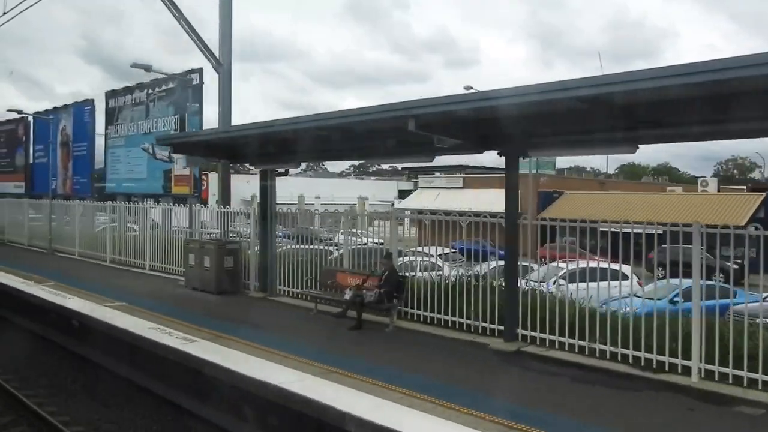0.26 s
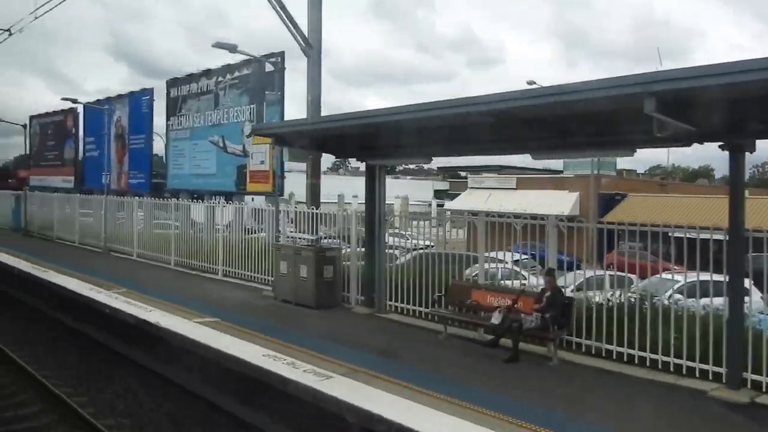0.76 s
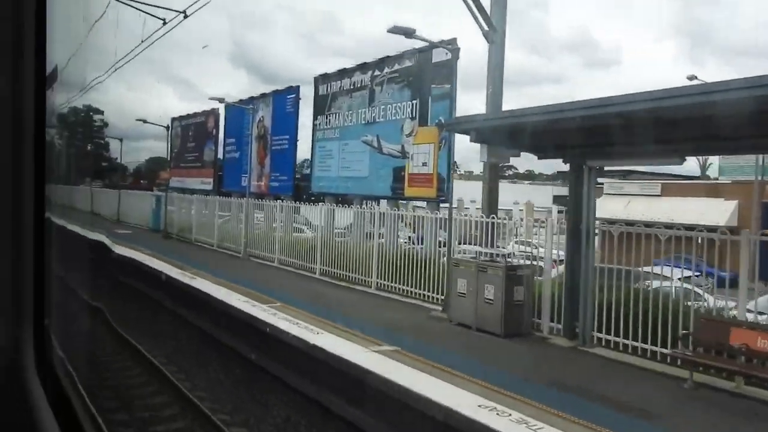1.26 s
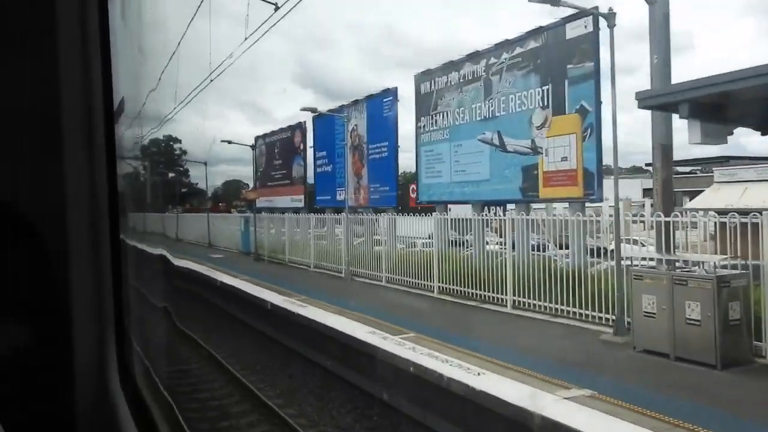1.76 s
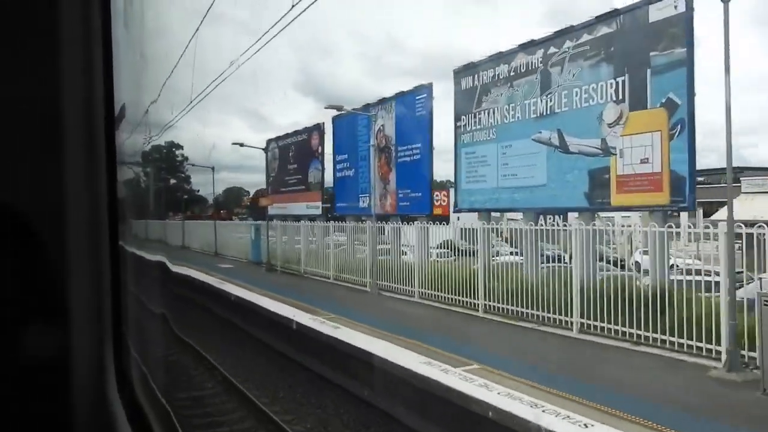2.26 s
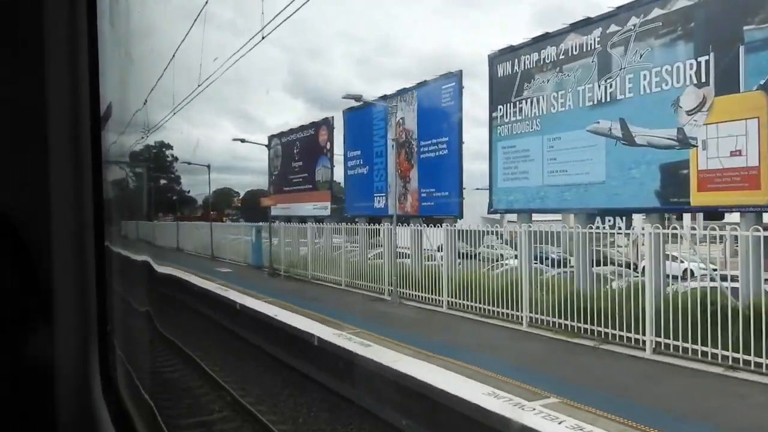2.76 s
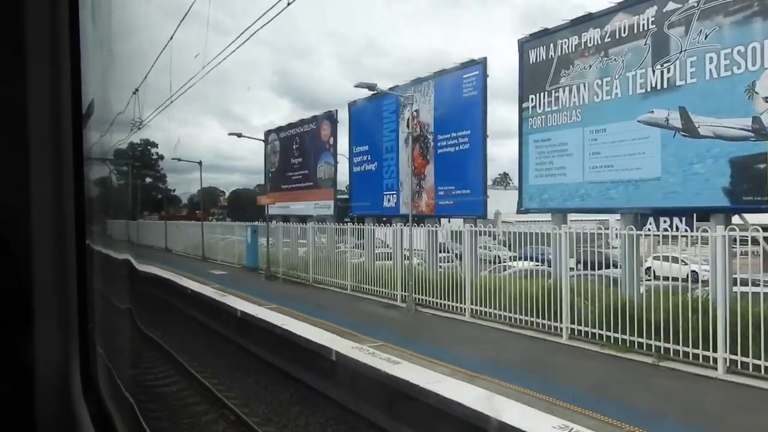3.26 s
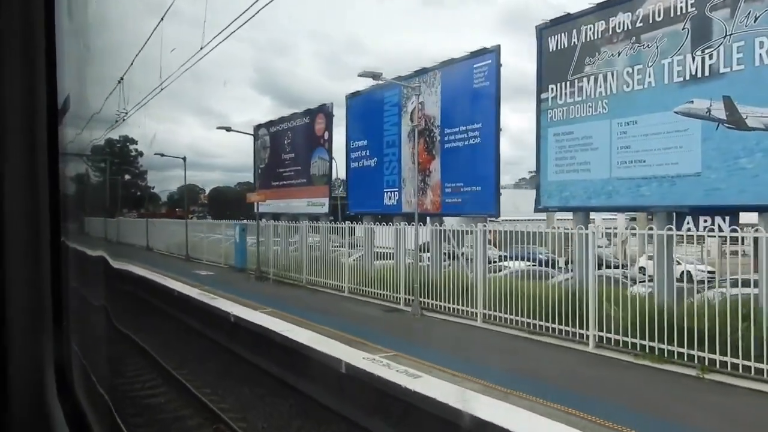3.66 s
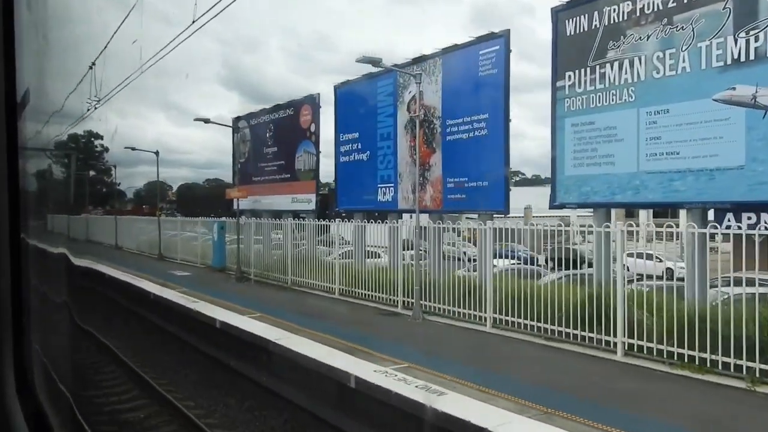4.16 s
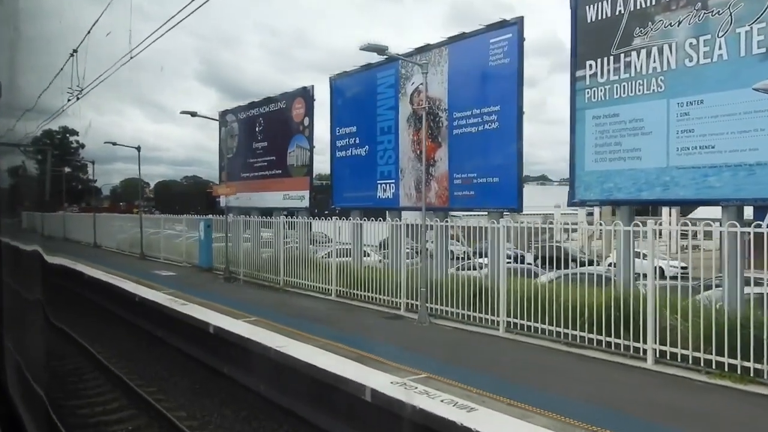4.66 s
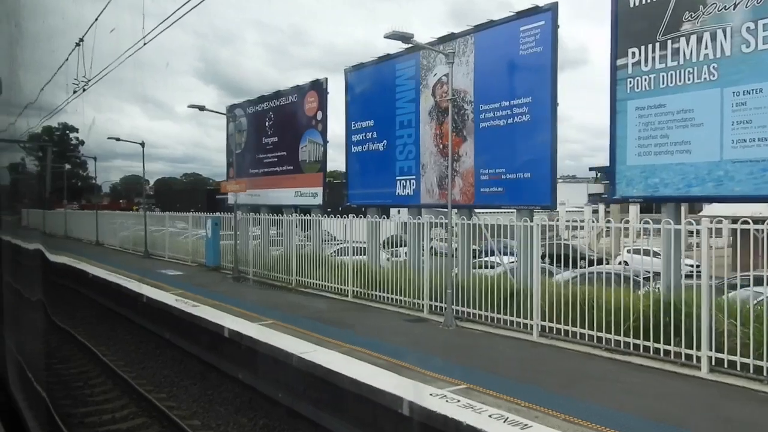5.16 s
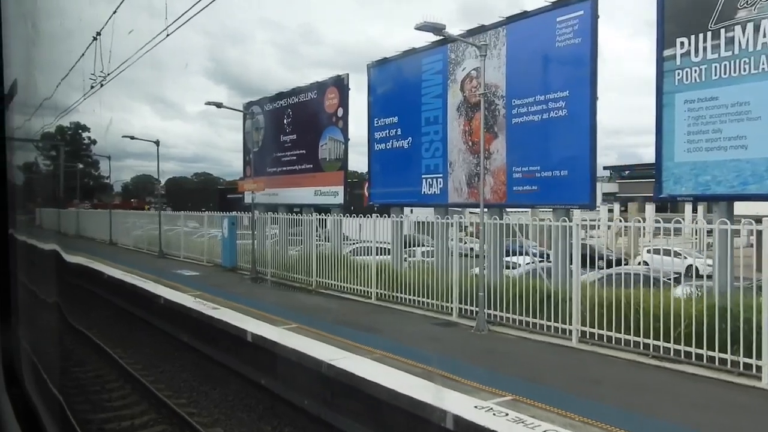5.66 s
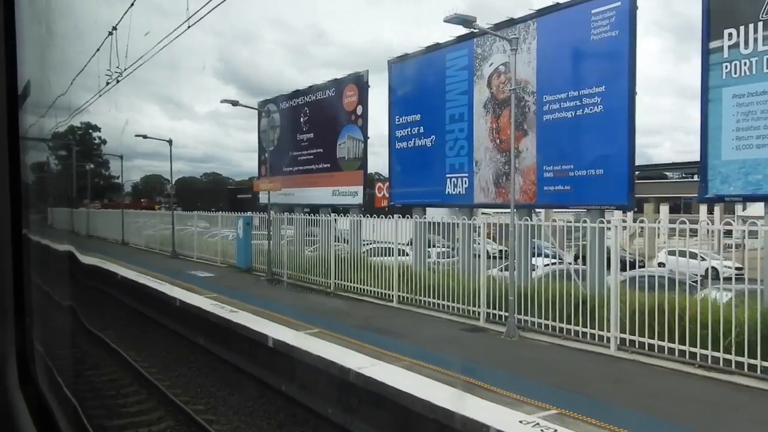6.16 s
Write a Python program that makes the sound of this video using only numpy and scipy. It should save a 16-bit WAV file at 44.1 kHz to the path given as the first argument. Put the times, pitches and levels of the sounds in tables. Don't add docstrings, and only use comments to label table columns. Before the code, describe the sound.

For about 6.4 seconds we are inside a slowly moving electric train carriage, near the window. A thick, low rolling rumble runs throughout, mostly below 250 hertz, with a deep boom that swells and sinks unevenly and a steadier compressor drone around 190 hertz that dips briefly near 0.8 and 1.9. Softer panel noise and a faint vent hiss lie above. At 0.4 a soft breathy valve whistle puffs, with a tiny click. Small dull metallic ticks come at 1.2 and 1.3, then a pair near 1.6 and a double hit at 1.75, with short airy puffs. Very faint, thin brake squeaks glide around 2.6, 4.7 to 5.0 and 5.7, with a barely audible click at 3.1. A slow weak air release comes at 5.5, and a short, clearer burst of air at 6.0. The rumble continues to the end in a small, enclosed cabin.

```python
import sys
import numpy as np
from scipy import signal
from scipy.fft import rfft, irfft, next_fast_len
from scipy.io import wavfile
from scipy.ndimage import uniform_filter1d, map_coordinates

SR = 44100
rng = np.random.default_rng(int(sys.argv[2]) if len(sys.argv) > 2 else 0)


def dump(signal):
    limited = np.clip(np.atleast_2d(signal).T, -1, 1)
    pcm = np.round(limited * 32767).astype(np.int16)
    wavfile.write(sys.argv[1], SR, pcm)


def ratio_of_db(decibels):
    return 10 ** (np.asarray(decibels, float) / 20)


N = 282240

# t/s, level/dB
BOOM_LEVEL = [(0.0, -20), (0.05, -24), (0.46, -40), (0.48, -32), (0.98, -44.5), (1.64, -20), (1.82, -34.5),
              (1.98, -29.5), (2.05, -34.5), (2.58, -29.5), (2.65, -41), (3.4, -27), (3.44, -37.5),
              (4.49, -27), (5.38, -36.5), (5.56, -24), (5.83, -42.5), (6.4, -27)]
# t/s, level/dB
DRONE_LEVEL = [(0, -23), (.7, -23.5), (.8, -35), (.9, -23), (1.5, -26), (1.9, -35.5), (2.12, -22),
               (3.1, -26), (3.75, -24.5), (4.3, -25), (5.05, -29), (5.15, -22.5), (6.4, -23)]
# f/Hz, density/(dB per Hz)
BODY_SPECTRUM = [(8.8, -68), (15, -47), (32, -10), (54, -5), (70, -4), (96, -7.5), (119, -7.5), (135, -3.5),
                 (161, -1.5), (174, -3.5), (185, -10), (240, -5), (410, -120)]
# f/Hz, density/(dB per Hz)
FLOOR_SPECTRUM = [(120, -34), (200, -2.5), (221, -4.5), (242, -9.5), (258, -15), (272, -17.5), (300, -17),
                  (340, -14.5), (365, -17.5), (405, -18.5), (430, -17.5), (478, -29), (500, -37),
                  (650, -120)]
# f/Hz, density/(dB per Hz)
PANEL_SPECTRUM = [(400, -51), (500, -5), (525, -5.5), (553, -6), (575, 0), (600, 0), (616, -0.5),
                  (660, 1.5), (690, -2.5), (715, -8), (790, -9), (898, -15), (1100, -15.5), (1200, -36),
                  (2000, -120)]
# f/Hz, density/(dB per Hz)
VENT_SPECTRUM = [(650, -14), (1100, -3.5), (1240, -7.5), (1720, -9.5), (1860, -10), (2030, -12.5),
                 (3320, -15.5), (3990, -14), (7070, -18), (9010, -16), (11200, -31), (14500, -60),
                 (22000, -120)]
# f/Hz, level/dB, wander/Hz, left minus right/dB
MACHINE_TONES = [(49.2, -49.5, 2.1, .1), (72.6, -53, 3.572, -1.5), (100.1, -34.5, 3.72, -0.7),
                 (282.8, -44, 0.793, 6), (570.6, -52, 5.5, 3.5), (624.5, -50, 6.05, -.4),
                 (664, -54.5, 7.16, 2.5)]
# crest t/s, level/dB, rise/s, fall/s, whistle share/0-1
VALVE_PUFFS = [
    (.39, -47.5, 0.075, 0.083, 0.82),
    (.46, -57, 0.014, 0.019, 0.4),
    (.97, -65, 0.029, 0.038, 0),
    (1.62, -57, .015, 0.029, 0.5),
    (1.76, -56, 0.014, 0.018, 0),
    (5.53, -56.5, 0.052, 0.1, 0.2),
    (5.985, -58.5, 0.029, .02, 0.3),
    (6.022, -36.5, 0.02, 0.06, 0),
]
# f/Hz, density/(dB per Hz)
JET_SPECTRUM = [(700, -47), (1100, -9), (1500, -6.5), (2050, -21), (2350, -16), (2800, -8), (3500, -10.5),
                (6000, -5), (8400, -14), (9900, -13), (11200, -29), (14500, -56), (16000, -90)]
# f/Hz, density/(dB per Hz)
LEAK_SPECTRUM = [(4500, -25), (7000, -8), (8500, 1), (9800, -6.5), (11200, -27), (14000, -80)]
# f/Hz, width/Hz, level/dB
WHISTLE_MODES = [(3280, 650, -.5), (2300, 700, -6), (4000, 900, -6)]
# t/s, level/dB, f/Hz, t60/s
FITTING_TICKS = [
    (1.205, -53.5, 1860, .25),
    (1.30, -56, 1900, .12),
    (1.59, -53, 2080, .1),
    (1.625, -54, 2050, .08),
    (.452, -58, 7050, .06),
    (1.752, -55, 2850, .05),
    (1.754, -52, 1950, .07),
    (3.12, -60, 7400, .05),
]
# start t/s, length/s, first f/Hz, last f/Hz, level/dB
SHOE_SQUEAKS = [
    (2.56, .09, 10400, 9950, -69),
    (2.658, .11, 9560, 10950, -65),
    (4.68, .115, 12600, 10900, -79),
    (4.795, .16, 10800, 12350, -77),
    (5.03, .065, 10250, 9750, -69),
    (5.73, .13, 9900, 9850, -70),
]
# f/Hz, likeness/0-1
LIKENESS = [(20, .97), (60, .995), (225, .99), (270, .82), (500, .86), (620, .96), (1160, .82),
            (2430, 0.67), (5100, 0.6), (8500, 0.08), (12000, .05)]
# f/Hz, left minus right/dB
BALANCE = [(60, 0.5), (200, -1.1), (235, 0.5), (270, 3.5), (400, 4.5), (480, 5.5), (620, 0), (750, 1.5),
           (1620, 0.7), (4170, 0.5), (6680, -2), (10700, 0.5)]
# centre f/Hz, reach above/Hz, reach below/Hz, comb spacing/Hz, strength
PANE = (3875, 200, 400, 100.5, .62)
# f/Hz, density/(dB per Hz)
MIC_NOISE_SPECTRUM = [(10500, -59), (12000, -9), (12700, -7), (13000, -1.5), (13500, -3.5), (14900, -8.5),
                      (15500, -67)]

BODY_DB, FLOOR_DB, PANEL_DB, VENT_DB = -28, -30.5, -39, -47
SWAY_DB, SWAY_KNOTS_PER_S = .4, 4.5
BOOM_HZ, BOOM_HAZE_WIDTH_HZ, BOOM_HAZE_DB = 124.2, 16.3, -32
DRONE_HZ, DRONE_HAZE_WIDTH_HZ, DRONE_HAZE_DB = 194.2, 22, -31.5
SQUEAK_S_SHARE, SQUEAK_FADE_DB_PER_KHZ = .5, 5
CABIN_T60_S, ECHO_DB = 0.29, -8
LEFT_ROLLOFF_HZ, RIGHT_ROLLOFF_HZ = 75, 25
MIC_NOISE_DB, CONVERTER_OFFSET = -77.5, -.0018


def unit(x):
    return x / np.sqrt(np.mean(np.abs(x) ** 2) + 1e-20)


def along(points, hz):
    f, v = np.transpose(points)
    return np.interp(np.log(hz + 1), np.log(f + 1), v)


def level_curve(rows):
    t, db = np.transpose(rows)
    return np.interp(np.arange(N) / SR, t, db)


def wobble(knots_per_s):
    return map_coordinates(rng.standard_normal(400), [np.arange(N) * knots_per_s / SR])


def filtered(x, response):
    m = next_fast_len(N + SR // 2)
    return irfft(rfft(x, m) * response(np.fft.rfftfreq(m, 1 / SR)), m)[..., :N]


def coloured(spectrum):
    return lambda hz: ratio_of_db(along(spectrum, hz))


def rush(gain, patchy_db, apart=1):
    z = signal.stft(rng.standard_normal((2, N)), nperseg=512)[2]
    field = uniform_filter1d(rng.standard_normal(z.shape[1:]), 6, 0)
    field = uniform_filter1d(field, 12, 1)
    pair = signal.istft(z * ratio_of_db(patchy_db * unit(field)), nperseg=512)[1][:, :N]

    def mid_side_gain(hz):
        angle = np.arccos(np.clip(apart * along(LIKENESS, hz), -1, 1)) / 2
        return gain(hz) * [np.cos(angle), np.sin(angle)]

    mid, side = filtered(pair, mid_side_gain)
    left_right = np.array([mid + side, mid - side])
    both = filtered(left_right, lambda hz: ratio_of_db(along(BALANCE, hz) * [[.5], [-.5]]))
    return both / np.sqrt(np.mean(both.mean(0) ** 2))


def tone(hz, db, lean_db):
    phase = 2 * np.pi * (np.cumsum(hz) / SR + rng.random())
    wave = np.sqrt(2) * ratio_of_db(db) * np.sin(phase)
    return wave * ratio_of_db(lean_db * np.array([[.5], [-.5]]))


def haze(centre_hz, width_hz, db):
    return ratio_of_db(db) * rush(lambda f: np.exp(-((f - centre_hz) / width_hz) ** 2), patchy_db=-1.3)


def rolling():
    sway_db = SWAY_DB * wobble(SWAY_KNOTS_PER_S)
    body = ratio_of_db(BODY_DB + sway_db) * rush(coloured(BODY_SPECTRUM), patchy_db=0.43)
    floor = ratio_of_db(FLOOR_DB + sway_db) * rush(coloured(FLOOR_SPECTRUM), patchy_db=-1.2)
    panel = ratio_of_db(PANEL_DB + sway_db) * rush(coloured(PANEL_SPECTRUM), patchy_db=1.08)
    vent = ratio_of_db(VENT_DB + .3 * wobble(7)) * rush(coloured(VENT_SPECTRUM), patchy_db=0.92)
    return body + floor + panel + vent


def machines():
    boom_db = level_curve(BOOM_LEVEL) - .6
    drone_db = level_curve(DRONE_LEVEL) - 1.0 + 1.13 * wobble(9)
    hum = tone(BOOM_HZ + .2 * wobble(1.557), boom_db, -.6)
    hum += haze(BOOM_HZ + 4, BOOM_HAZE_WIDTH_HZ, BOOM_HAZE_DB)
    hum += tone(np.full(N, DRONE_HZ), drone_db, -.8)
    hum += haze(DRONE_HZ - 6, DRONE_HAZE_WIDTH_HZ, DRONE_HAZE_DB)
    hum += tone(487.9 + .1 * wobble(3), -47.5 + .3 * wobble(4), 11)
    for hz, db, wander_hz, lean_db in MACHINE_TONES:
        swing_db = np.minimum(wander_hz, 3) * np.tanh(wobble(7))
        hum += tone(hz + wander_hz * wobble(8), db + swing_db, lean_db)
    return hum


def valves():
    def body_gain(f):
        modes = [ratio_of_db(db) * 1j * f * w / (c * c - f * f + 1j * f * w) for c, w, db in WHISTLE_MODES]
        return np.abs(sum(modes)) ** 2

    t = np.arange(N) / SR
    jet = rush(coloured(JET_SPECTRUM), patchy_db=3.2, apart=.7)
    whistle = rush(body_gain, patchy_db=.5, apart=.8)
    leak = rush(coloured(LEAK_SPECTRUM), patchy_db=1.5)
    spit_spectrum = [(9000, -60), (11000, -.5), (13500, -9), (15000, -24), (16000, -80)]
    spit = rush(coloured(spit_spectrum), patchy_db=1.2)
    air = np.zeros((2, N))
    for crest_s, db, rise_s, fall_s, share in VALVE_PUFFS:
        before = np.clip(crest_s - t, 0, None) / rise_s
        after = np.clip(t - crest_s, 0, None) / fall_s
        swell = np.exp(-before ** 2 - after)
        air += ratio_of_db(db) * swell * (np.sqrt(1 - share) * jet + np.sqrt(share) * whistle)
        air += ratio_of_db(db + 1.5) * np.sqrt(1 - share) * swell * leak
        air += ratio_of_db(db - 17) * np.exp(-3 * np.abs(t - crest_s + .3 * rise_s) / rise_s) * spit
    return air


def ticks():
    out, t = np.zeros(N + SR), np.arange(SR // 2) / SR
    for start_s, db, hz, t60_s in FITTING_TICKS:
        drift = .08 * np.cumsum(rng.standard_normal(len(t)))
        envelope = ratio_of_db(db + 11.0 - 60 * t / t60_s) * (1 - np.exp(-t / 0.0021))
        ring = envelope * np.sin(2 * np.pi * hz * t + drift)
        out[round(start_s * SR):][:len(t)] += ring
    return out[:N]


def squeaks():
    t, out = np.arange(N) / SR, np.zeros((2, N))
    for start_s, length_s, first_hz, last_hz, db in SHOE_SQUEAKS:
        u = np.clip((t - start_s) / length_s, 0, 1)
        glide = u - SQUEAK_S_SHARE * np.sin(2 * np.pi * u) / (2 * np.pi)
        hz = first_hz + (last_hz - first_hz) * glide
        fade_db = SQUEAK_FADE_DB_PER_KHZ * (hz - min(first_hz, last_hz)) / 1000
        envelope = np.abs(np.sin(np.pi * u)) ** .4
        out += envelope * tone(hz, db + 5 - fade_db + 1.5 * wobble(40), -1.5)
    return out


def cabin(x):
    t = np.arange(SR // 2) / SR
    tail = rng.standard_normal((2, len(t))) * ratio_of_db(-60 * t / CABIN_T60_S)
    return signal.fftconvolve(x, tail / np.linalg.norm(tail[0]), axes=1)[:, :N]


def window(x):
    centre_hz, above_hz, below_hz, spacing_hz, strength = PANE

    def response(hz):
        offset_hz = hz - centre_hz
        reach_hz = np.where(offset_hz > 0, above_hz, below_hz)
        return 1 + strength * np.exp(-(offset_hz / reach_hz) ** 2 - 2j * np.pi * offset_hz / spacing_hz)

    return filtered(x, response)


def scene():
    steady = rolling() + machines()
    small = valves() + ticks() + squeaks()
    echo = ratio_of_db(ECHO_DB) * cabin(small)
    return window(steady + small + echo)


def capsules(x):
    def response(f):
        ratio = (1j * f + RIGHT_ROLLOFF_HZ) / (1j * f + LEFT_ROLLOFF_HZ)
        return ratio ** np.array([[.5], [-.5]])

    return filtered(x, response)


def top_cut(x):
    return signal.sosfilt(signal.butter(12, 14990, fs=SR, output="sos"), x)


def record(dry):
    hiss = ratio_of_db(MIC_NOISE_DB) * rush(coloured(MIC_NOISE_SPECTRUM), patchy_db=.6)
    mix = capsules(dry) + hiss + CONVERTER_OFFSET
    return top_cut(mix)


dry = scene()
out = record(dry)
dump(out)
```